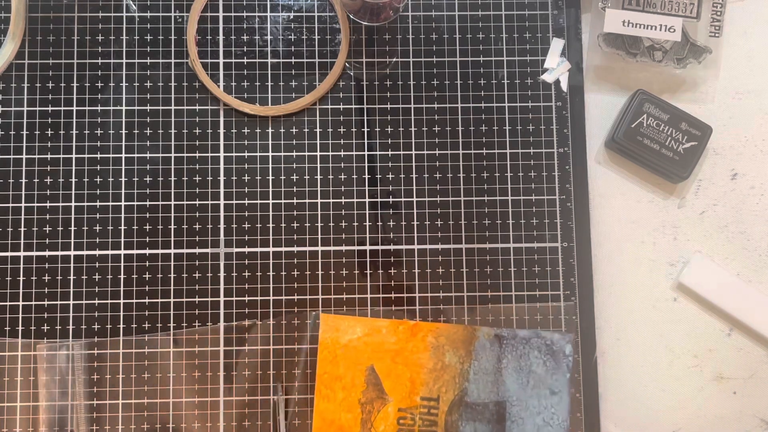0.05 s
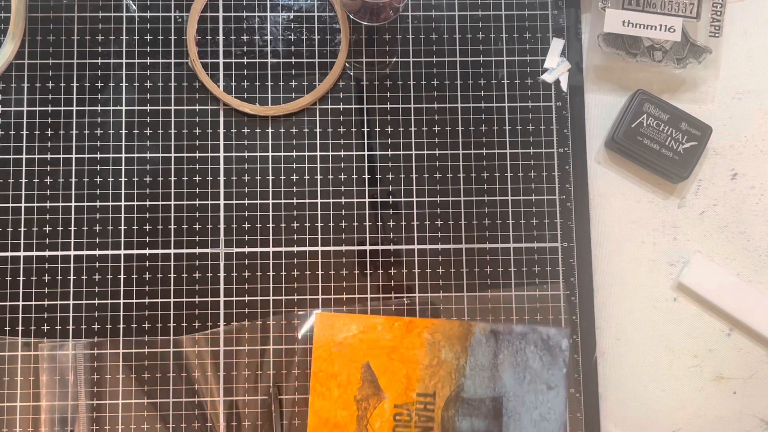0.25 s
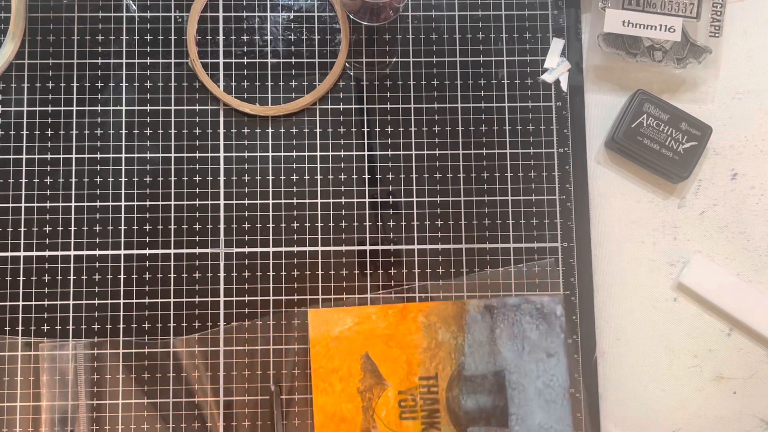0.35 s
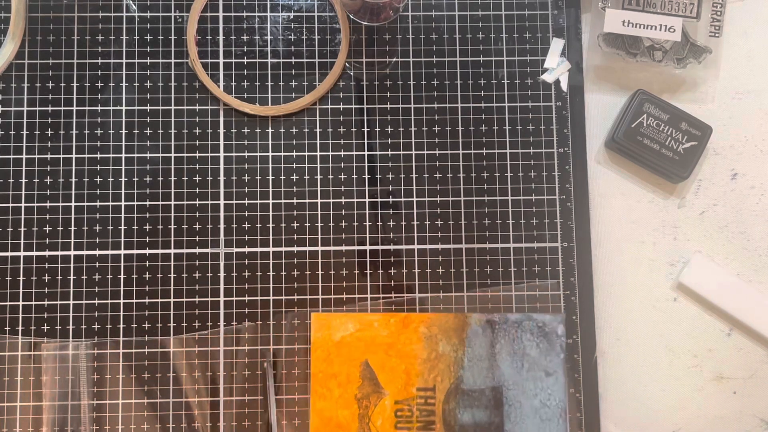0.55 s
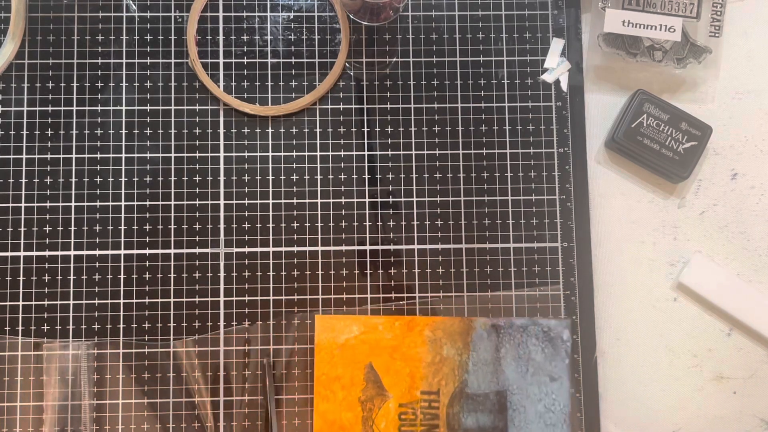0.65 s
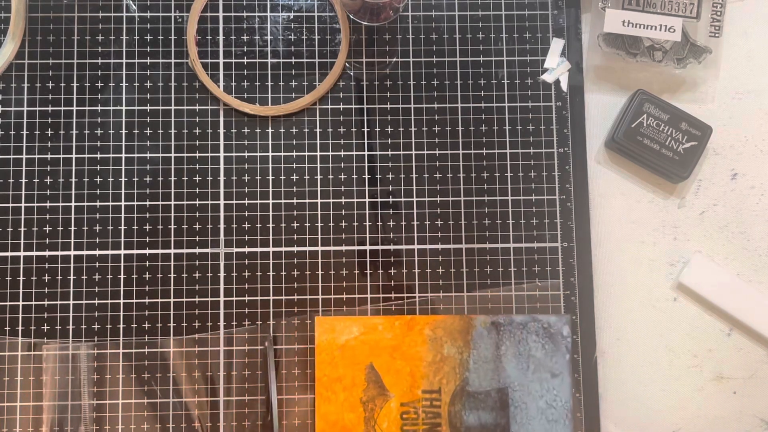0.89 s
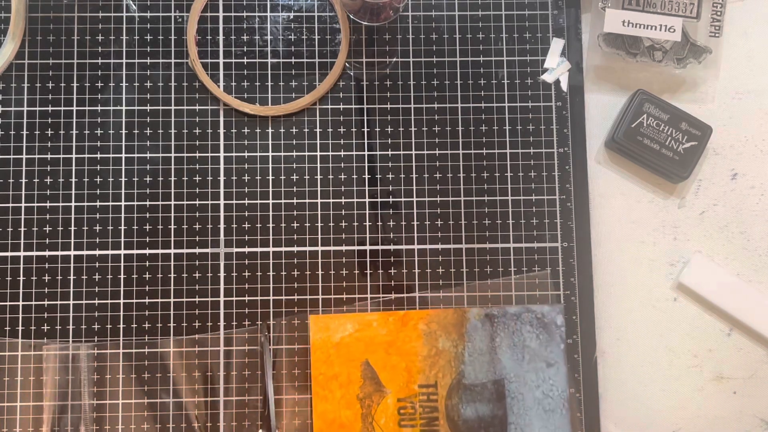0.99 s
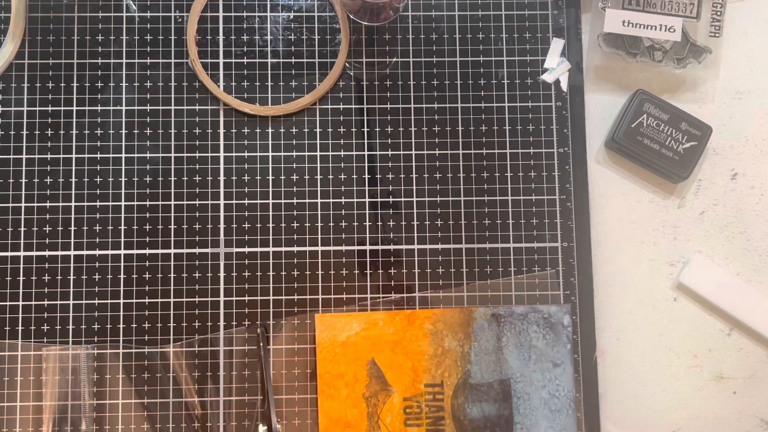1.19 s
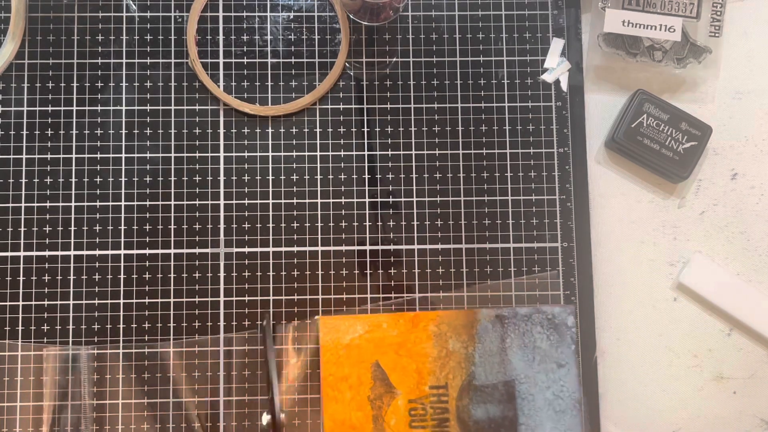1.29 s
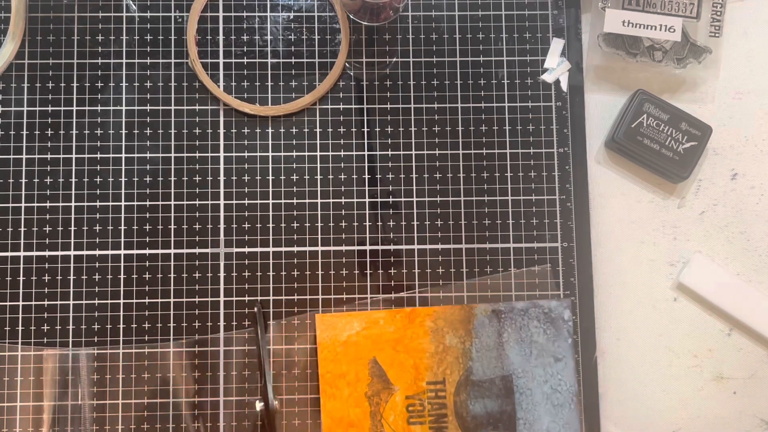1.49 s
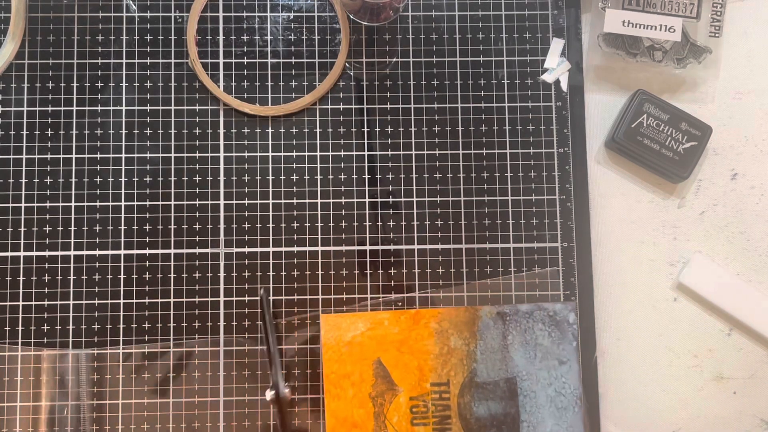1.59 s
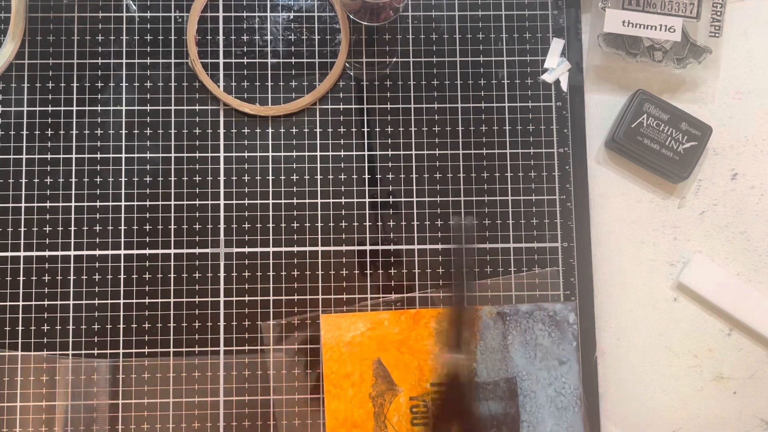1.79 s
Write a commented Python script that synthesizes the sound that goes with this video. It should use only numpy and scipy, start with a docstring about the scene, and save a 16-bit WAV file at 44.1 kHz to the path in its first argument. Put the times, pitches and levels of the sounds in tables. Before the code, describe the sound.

Scissors cut thin plastic film in four crisp, ratchety rasps at about 0.2, 0.6, 1.1 and 1.5 seconds, each around a tenth of a second or less, slowing slightly and ending in clicks. Between them the pivot creaks softly, film rustles, notably near 0.7, and hands thud dully on the table. Rustle and tiny ticks continue to the end. Close phone microphone, short room tail, low hush.

```python
"""Film rustles and ticks on a craft mat, a hand thuds on the table, then scissors make four short cuts through
thin plastic film, close under a phone. In each cut the film sticks and slips along the blades, some 400 times a
second and slower as the tips close; each slip rings blades and sheet over a tearing hiss. Lone slips sound as
the blades bite and the tips meet. Between cuts the pivot creaks open and film drags on a blade edge; thuds come
up to the last cut, while rustle and ticks go on past it. A small quiet room adds its tail and hush throughout."""
import sys
import numpy as np
from scipy import signal
from scipy.fft import rfft, irfft
from scipy.io import wavfile
from scipy.ndimage import uniform_filter1d

SR = 44100
rng = np.random.default_rng(int(sys.argv[2]) if len(sys.argv) > 2 else 0)


def decibels_to_gain(level_db):
    """Convert a level in decibels to a linear amplitude gain (20 dB per decade)."""
    exponent = np.asarray(level_db, float) / 20
    return 10 ** exponent


def generate_wav(signal):
    """Clip the signal to [-1, 1] and save it as 16-bit WAV at the path in sys.argv[1]."""
    frames = np.transpose(np.atleast_2d(signal))
    scaled = np.clip(frames, -1, 1) * 32767
    pcm = np.round(scaled).astype(np.int16)
    wavfile.write(sys.argv[1], SR, pcm)


N = 81585
T = np.arange(N) / SR
HZ = np.maximum(np.arange(N // 2 + 1) * SR / N, 1.)
SIDES = np.array([[1], [-1]])  # left, right


def unit(x):
    """Scale to rms 1."""
    return x / np.sqrt(np.mean(x ** 2))


def shaped(x, points):
    """Colour by (f/Hz, gain/dB) points, interpolated over log frequency."""
    p = np.array(points, float)
    gain_db = np.interp(np.log(HZ), np.log(p[:, 0]), p[:, 1])
    return irfft(rfft(x) * decibels_to_gain(gain_db), N)


def ring(x, hz, width_hz):
    """Resonance with gain 1 at its centre."""
    return signal.lfilter(*signal.iirpeak(hz, hz / width_hz, SR), x)


def body(x, peaks):
    """Sum of resonances (f/Hz, width/Hz, level/dB), signs alternating with rising frequency."""
    out = 0
    for k, (hz, width_hz, db) in enumerate(sorted(peaks)):
        out = out + (-1) ** k * decibels_to_gain(db) * ring(x, hz, width_hz)
    return out


def tilt(x, db_per_octave):
    """Moving brightness about 4 kHz: three bands weighed against each other."""
    low, below_treble = (signal.lfilter(*signal.butter(1, hz, fs=SR), x) for hz in (2000, 7000))
    treble = x - below_treble
    return low * decibels_to_gain(-1.5 * db_per_octave) + (below_treble - low) + treble * decibels_to_gain(1.745 * db_per_octave)


def spikes(times_s, sizes):
    """A train of single samples of the given sizes."""
    places = np.clip((np.asarray(times_s) * SR).astype(int), 0, N - 1)
    return np.bincount(places, sizes, N)


SLIP_RISE_S, SLIP_FALL_S = .0004, .0006


def release(t, fall_s):
    """Envelope of a sudden release: a smooth rise, then exponential decay."""
    return (1 - np.exp(-t / SLIP_RISE_S)) ** 2 * np.exp(-t / fall_s)


def burst(train, fall_s):
    """Each spike becomes a short swell that dies away."""
    shape = release(T[:800], fall_s)
    return signal.fftconvolve(train, shape / shape.max())[:N]


SLIP_GRIT_DB = -6  # rough part against the clean snap


def snap(train):
    """Each slip is a clean snap inside a short rough swell."""
    shape = release(T[:200], SLIP_FALL_S)
    rough = burst(train, SLIP_FALL_S) * rng.standard_normal(N)
    grit = rough * shape.max() / np.sqrt(np.sum(shape ** 2))
    return np.roll(train, np.argmax(shape)) + decibels_to_gain(SLIP_GRIT_DB) * grit


def swell(start_s, length_s):
    """A quick rise and a slower fall."""
    return np.sin(np.pi * np.clip((T - start_s) / length_s, 0, 1) ** .6)


# blade force, one list per cut: t/s, level/dB, brightness/(dB/octave), low blade ring/dB
FORCE = [
    [(.19, -28, 1, -13), (.203, -34.5, -9, -23), (.212, -24.5, -8.5, -40), (.228, -21.5, 0.5, -0.5),
     (.258, -22, 2, 18), (.268, -22, 4.5, 10), (.2835, -25.5, 5, 2)],
    [(.6125, -24, 0, 1), (.6195, -26, -2, -2), (.623, -18, -1.5, -3.5), (.675, -21.5, -0.5, -1),
     (.693, -17, 0.5, -2)],
    [(1.067, -44, -7, -5), (1.073, -20, -0.5, -5.5), (1.082, -27.5, 5.5, 5), (1.095, -23, 2.5, -2),
     (1.108, -23.5, 2.5, -21), (1.135, -22.5, 1.5, -3), (1.149, -26.5, 2., -4)],
    [(1.483, -38.5, 8, -8), (1.499, -22, 4.5, -16), (1.51, -31, 8, -12), (1.518, -29, 9.5, -12),
     (1.533, -34.5, 7, -4)],
]
# pace of the slips, one row per cut: first slip/s, rate/(slips/s), slowing from/s, end rate/(slips/s)
PACE = [(0.2024, 454, 0.23, 267), (0.6148, 440, 0.66, 235), (1.0731, 385, 1.125, 200),
        (1.4852, 333, 1.49, 320)]
# load on the sheet, one row per cut: push/dB, upper sheet mode/dB
LOAD = [(-8.5, 5.5), (-10, 7), (-9.5, 6), (-7, 7.5)]
# tearing hiss under the slips, one per cut: level/dB
TEAR_DB = [-2.5, -2, -1, 3]
# rings of blades and film, low blade ring first: f/Hz, width/Hz, level/dB
RINGS = [(2605, 790, -2), (1920, 600, 1), (3680, 1470, -4.5), (5304, 674, 0), (6610, 630, -3.5),
         (7530, 660, -2.), (9360, 1100, 2), (10490, 990, 4), (13150, 1300, -4)]
# drumming of the sheet, upper mode first: f/Hz, width/Hz, level/dB
SHEET = [(800, 103, 7.5), (434, 91, 3.5), (593, 62, 4), (1144, 1120, -1)]
RING_TRADE = 0.12  # dB lost near 5 kHz per dB gained by the low blade ring
SLIP_JITTER_S, SLIP_SCATTER_DB = .0001, 1.5


def cut(force, pace, load, tear_db):
    """Stick and slip: every release cracks the film, rings the blades and pushes the sheet."""
    c = np.array(force)
    first_s, rate, slowing_s, end_rate = pace
    push_db, upper_db = load
    start_s, end_s = c[0, 0], c[-1, 0]
    on = (T > start_s) & (T < end_s)
    level_db, bright, ring_db = (np.interp(T, c[:, 0], c[:, k]) for k in (1, 2, 3))

    speed = np.interp(T, [slowing_s, end_s], [rate, end_rate])
    turns = np.cumsum(speed) / SR
    turns -= np.interp(first_s, T, turns)  # a slip falls at each whole turn
    count = np.arange(np.ceil(turns[on][0]), turns[on][-1])
    chance = rng.standard_normal((80, 2))[:len(count)]
    times_s = np.interp(count, turns, T) + SLIP_JITTER_S * chance[:, 0]
    train = spikes(times_s, decibels_to_gain(SLIP_SCATTER_DB * chance[:, 1]))

    hiss = decibels_to_gain(tear_db) * (speed / rate) ** 2 * on * rng.standard_normal(N)  # thins as the slips slow
    drive = snap(train) * np.sqrt(SR / rate) + hiss
    forced = drive * decibels_to_gain(level_db)
    crack = body(forced, RINGS[1:])
    crack += ring(body(drive * decibels_to_gain(level_db + ring_db), RINGS[:1]), *RINGS[0][:2])
    crack += body(forced * (decibels_to_gain(-RING_TRADE * ring_db) - 1), RINGS[3:4])
    crack /= np.std(body(drive, RINGS)[on])

    hz, width_hz, db = SHEET[0]
    loaded_sheet = [(hz, width_hz, db + upper_db)] + SHEET[1:]
    beat = train * np.sqrt(SR / rate) + 0.89 * drive
    push = body(beat * decibels_to_gain(level_db), loaded_sheet) / np.std(body(beat, SHEET)[on])
    return tilt(crack, bright) + decibels_to_gain(push_db) * push


# lone slips as the blades bite and the tips meet: t/s, relative level/dB, brightness/(dB/octave)
LONE = [(.1875, -24, 1), (.1971, -24, 0), (.2048, -17, 0), (.2097, -13, 1), (.217, -13, 2), (.2869, -10, 3),
        (.2969, -8, 3), (.3046, -9, 3), (.6035, -24, 1), (.6057, -16, 0), (.6133, -15, 0), (.695, -12, 2),
        (.7006, -11, 1), (.7158, -12, 2), (.7245, -24, -2), (1.0981, -10, 5), (1.101, -8, 5),
        (1.1074, -7, 5), (1.1542, -20, 4), (1.5021, -12, 1), (1.5203, -11, 3)]
LONE_GAIN_DB = 1.5


def lone_slips():
    """Single releases through the same rings as the cuts."""
    e = np.array(LONE)
    train = spikes(e[:, 0], decibels_to_gain(e[:, 1]))
    one_ring = body(spikes([0], [1]), RINGS)
    crack = body(snap(train), RINGS) / np.abs(one_ring).max()
    return decibels_to_gain(LONE_GAIN_DB) * tilt(crack, np.interp(T, e[:, 0], e[:, 2]))


# film dragging on a blade edge: start/s, length/s, level/dB, f/Hz
DRAGS = [(0.461, 0.081, -48, 2760), (1.277, .055, -52, 5000)]
DRAG_Q = 5.2


def drags():
    """Edge friction: hiss gathered about one pitch by two equal resonances."""
    noise, out = rng.standard_normal(N), 0
    for start_s, length_s, db, hz in DRAGS:
        once = ring(noise, hz, hz / DRAG_Q)
        out = out + decibels_to_gain(db) * swell(start_s, length_s) * unit(ring(once, hz, hz / DRAG_Q))
    return out


# pivot creaking open: start/s, length/s, level/dB, top ring/dB
CREAKS = [(0.371, 0.041, -37.5, -15), (0.413, 0.026, -43, -7), (0.774, 0.057, -39, -11.5),
          (1.227, 0.09, -48, -4)]
# rings under the top ring: f/Hz, width/Hz, level/dB
PIVOT = [(650, 41, 2.5), (428, 93, -3.5), (1054, 210, -13)]
PIVOT_TOP_HZ, PIVOT_TOP_WIDTH_HZ = 1645, 88


def creaks():
    """Friction at the pivot, as noise, rings the handles and the blade root."""
    noise, out = rng.standard_normal(N), 0
    low = unit(body(noise, PIVOT))
    top = unit(ring(noise, PIVOT_TOP_HZ, PIVOT_TOP_WIDTH_HZ))
    for start_s, length_s, db, top_db in CREAKS:
        out = out + decibels_to_gain(db) * swell(start_s, length_s) * (low + decibels_to_gain(top_db) * top)
    return out


# film sliding over the mat: t/s, level/dB, brightness/(dB/octave)
RUSTLE = [(0, -42, -2.5), (0.088, -50.5, -5.5), (.11, -93.5, -20), (0.328, -58, -15), (.4, -47, -3),
          (.505, -43, -3.5), (0.544, -51.5, -3), (.6, -51, -8), (0.721, -26.5, -3.5), (.765, -64, 11.5),
          (.8, -48.5, -7.5), (0.869, -44, -2.5), (0.944, -63.5, -2.5), (1.004, -51, -1.),
          (1.051, -72.5, -3), (1.166, -54, -19.5), (1.232, -82, 2), (1.244, -48, -12), (1.309, -41.5, 5.5),
          (1.397, -67.5, -12), (1.466, -87.5, -16), (1.548, -39, -6), (1.585, -39.5, 6), (1.644, -36.5, 0),
          (1.671, -69, -2.5), (1.75, -53, 3), (1.85, -58, -16.5)]
# rustle spectrum: f/Hz, relative density/(dB per Hz)
RUSTLE_COLOUR = [(250, -8.5), (900, -8.5), (1700, -3), (2700, -2.5), (4000, -3), (6000, -3), (9000, -2.5),
                 (10500, 5), (12000, -4)]
GRAINS_PER_S, GRAIN_SPREAD_DB, GRAIN_FALL_S = 3500, 2.4, .001


def rustle():
    """Dense tiny crackles of the sliding film: noise gated by random bursts."""
    chance = rng.random((int(GRAINS_PER_S * N / SR), 2))
    sizes = decibels_to_gain(-GRAIN_SPREAD_DB * np.log(chance[:, 1]))
    gate = burst(spikes(chance[:, 0] * T[-1], sizes), GRAIN_FALL_S)
    film = unit(shaped(gate * rng.standard_normal(N), RUSTLE_COLOUR))
    t_s, level_db, bright = np.array(RUSTLE).T
    return tilt(film, np.interp(T, t_s, bright)) * decibels_to_gain(np.interp(T, t_s, level_db))


# ticks of the creased film: t/s, relative level/dB, f/Hz
TICKS = [(.0665, -31.5, 2730), (.4322, -26.5, 9500), (.5527, -22, 4250), (.5542, -25, 1350),
         (.8185, -33.5, 1600), (1.2381, -36, 4000), (1.269, -34, 3000), (1.3707, -36.5, 2360),
         (1.3888, -41, 4760), (1.389, -34, 1150), (1.5435, -23, 2300), (1.5835, -29.5, 1550),
         (1.653, -40, 2930), (1.716, -39.5, 1340), (1.787, -39.5, 1400), (1.8055, -27.5, 2170),
         (1.8332, -29, 5800), (1.8372, -25, 1380), (1.8434, -28, 2400)]
TICK_FALL_S, TICK_WIDTH_HZ = .0007, 270
TICK_RING_DB, TICK_WIDE_DB, TICK_SNAP_DB = 15, -1.5, 9


def ticks():
    """A crease pops: a wide crack and a brief ring at its own pitch."""
    out, noise = 0, rng.standard_normal(N)
    for t_s, db, hz in TICKS:
        spike = spikes([t_s], [decibels_to_gain(db)])
        pop = burst(spike, TICK_FALL_S) * noise + decibels_to_gain(TICK_SNAP_DB) * np.roll(spike, 20)
        out = out + decibels_to_gain(TICK_RING_DB) * ring(pop, hz, TICK_WIDTH_HZ)
        out = out + decibels_to_gain(TICK_WIDE_DB) * ring(pop, 1.6 * hz, min(2.6 * hz, SR / 3))
    return out


# hand and handles on the table: t/s, relative level/dB, depth/(dB per octave below 275 Hz)
THUDS = [(0.104, -48, 6), (.196, -40, -15), (0.295, -44.5, 5), (0.4176, -35.5, 3.5), (0.454, -47.5, -2),
         (0.62, -35.5, -16), (0.8197, -36.5, 6.5), (.863, -46.5, 5), (0.912, -64, -8), (1.075, -40.5, -10),
         (1.238, -46, -9), (1.25, -46, -9), (1.276, -47, -8), (1.3, -48, -2), (1.491, -43.5, -1)]
# modes of the table top: f/Hz, relative level/dB, t60/s
TABLE = [(75.7, -17.5, 0.36), (109, -13, 0.32), (163.6, -2, 0.11), (195.5, -8, 0.27), (275.2, 9, 0.12),
         (434, -1, 0.065)]
THUD_SAG, THUD_SAG_S = .06, .005  # phase advance that dies as the hand settles
THUD_ROUGH, THUD_ROUGH_RISE_S, THUD_RISE_CYCLES = .3, .011, .35


def thuds():
    """Soft blows ring the table top, fluttering under the hand; deeper ones favour its low modes."""
    out = np.zeros(N)
    for start_s, db, depth_db in THUDS:
        t = np.maximum(T - start_s, 0)
        for hz, mode_db, t60_s in TABLE:
            slow = uniform_filter1d(rng.standard_normal(N), size=600)
            flutter = unit(uniform_filter1d(slow, size=600))
            bloom = (1 - np.exp(-t * hz / THUD_RISE_CYCLES)) ** 2
            fade = np.exp(-np.log(1000) * t / t60_s) * bloom
            fade *= 1 + THUD_ROUGH * flutter * np.minimum(t / THUD_ROUGH_RISE_S, 1)
            level = decibels_to_gain(db + mode_db + depth_db * np.log2(275 / hz))
            out += level * fade * np.sin(2 * np.pi * hz * t * (1 + THUD_SAG * np.exp(-t / THUD_SAG_S)))
    return out


# share reaching the two ports a quarter cycle apart: f/Hz, level/dB
LOW_SIDE = [(100, -19), (250, -14), (1200, -6.5), (2000, -29), (4500, -14), (7000, -28)]


def bounce(sound):
    """A quarter-cycle-shifted share of the sound, opposite in sign at the two ports."""
    return signal.hilbert(shaped(sound, LOW_SIDE)).imag * SIDES


ROOM_T60_S, ROOM_WIDE, ROOM_DB = 0.26, 0.22, -12


def room_tail(near):
    """Diffuse reflections: convolution with decaying noise, partly different left and right."""
    t = T[:SR // 2]
    decay = np.exp(-np.log(1000) * t / ROOM_T60_S) * (t > .002)
    mid, side = rng.standard_normal((2, len(t))) * decay
    tail = (mid + ROOM_WIDE * side * SIDES) / np.sqrt(np.sum(mid ** 2))
    return decibels_to_gain(ROOM_DB) * signal.fftconvolve(near[None], tail, axes=1)[:, :N]


# spectrum of the room's hush: f/Hz, relative density/(dB per Hz)
FLOOR = [(30, -35), (70, -1.5), (300, -7), (1100, -21.5), (2500, -25), (8000, -49), (11500, -52)]
FLOOR_DB, FLOOR_WIDE = -67.5, 0.12


def hush():
    """Steady coloured noise, nearly alike at both ports."""
    mid, side = (unit(shaped(rng.standard_normal(N), FLOOR)) for _ in range(2))
    return decibels_to_gain(FLOOR_DB) * (mid + FLOOR_WIDE * side * SIDES)


def scene():
    """Near sources and thuds, the near sources' short room tail and the room's own hush."""
    near = sum(map(cut, FORCE, PACE, LOAD, TEAR_DB)) + lone_slips()
    near = near + ticks() + rustle() + drags() + creaks()
    near = signal.lfilter(*signal.butter(2, 260, "high", fs=SR), near)  # small parts radiate no bass
    direct = near + thuds()
    return direct + bounce(direct) + room_tail(near) + hush()


def top_cut(x):
    """Nothing passes above the cut-off."""
    return signal.sosfilt(signal.butter(12, 16990, fs=SR, output="sos"), x)


# lead of the right microphone port: f/Hz, phase/rad
PORT_LEAD = [(8600, 0.048), (11800, 2 * np.pi), (12700, 2 * np.pi), (13100, 3 * np.pi), (14300, 3 * np.pi),
             (14800, 4 * np.pi)]
# left minus right: f/Hz, level/dB
PORT_PAN = [(100, 1), (300, 3.5), (600, 1.5), (1300, 2), (2000, 0)]
# treble response of both ports: f/Hz, gain/dB
MIC_TOP = [(11500, -2.5), (12500, -12.5), (13200, -34), (14000, -15.5), (16400, -32)]


def record(dry):
    """Two phone ports: a dull top, a slight lean to the left, a phase turn between them in the treble."""
    lead_hz, lead_rad = np.array(PORT_LEAD).T
    pan_hz, pan_db = np.array(PORT_PAN).T
    lean = decibels_to_gain(np.interp(HZ, pan_hz, pan_db) / 2)
    half = lean * np.exp(-.5j * np.interp(HZ, lead_hz, lead_rad))  # each port takes half the difference
    ports = irfft(rfft(shaped(dry, MIC_TOP)) * np.array([half, 1 / half]), N)
    return top_cut(ports)


dry = scene()
out = record(dry)
generate_wav(out)
```